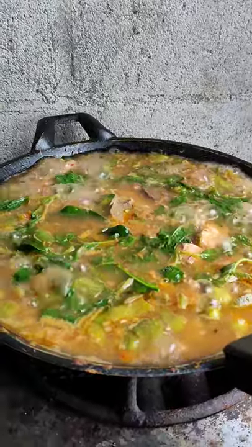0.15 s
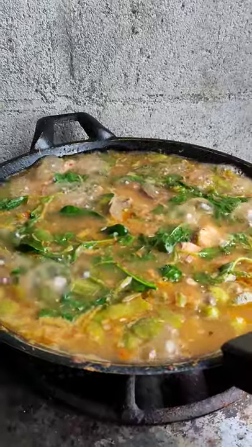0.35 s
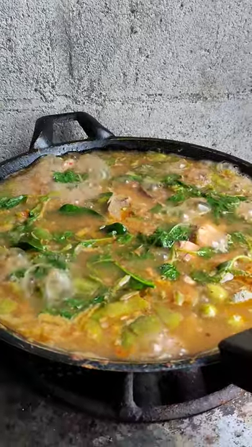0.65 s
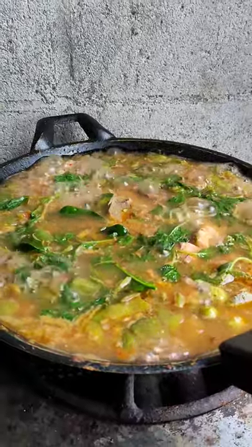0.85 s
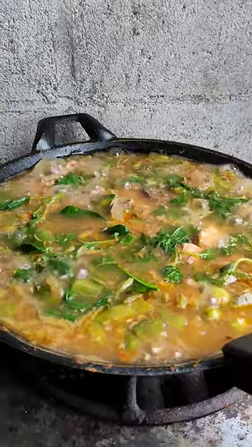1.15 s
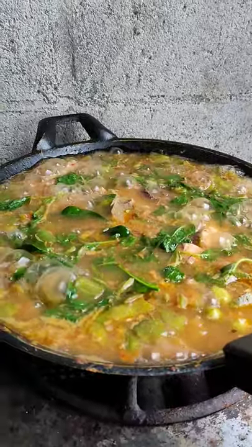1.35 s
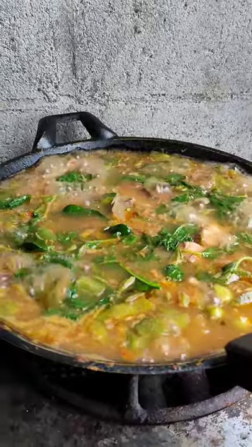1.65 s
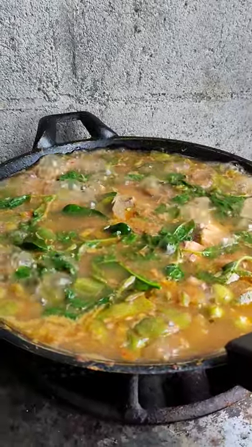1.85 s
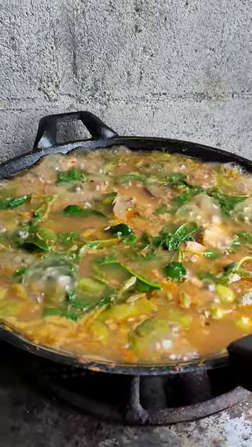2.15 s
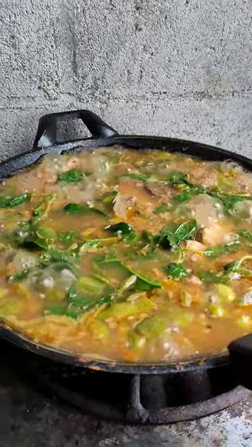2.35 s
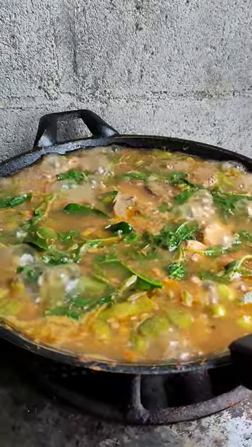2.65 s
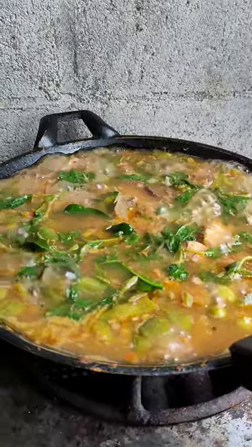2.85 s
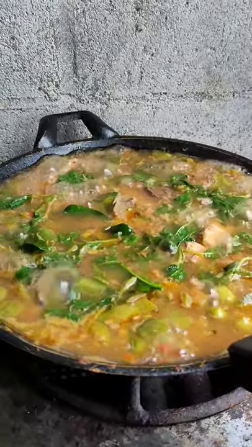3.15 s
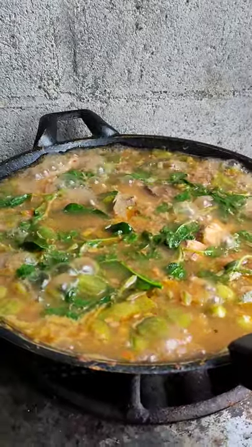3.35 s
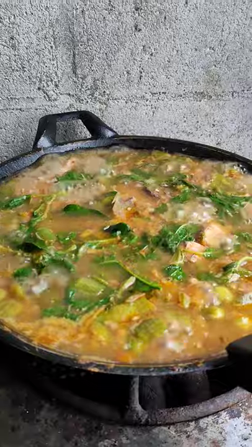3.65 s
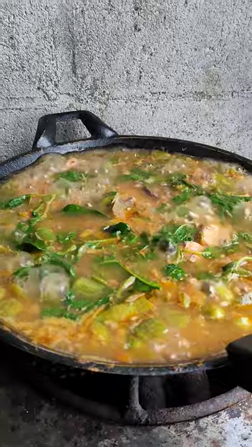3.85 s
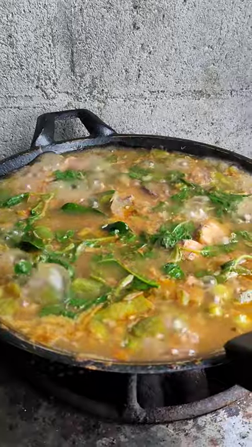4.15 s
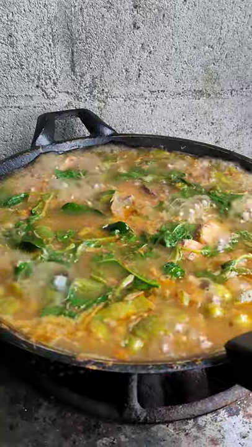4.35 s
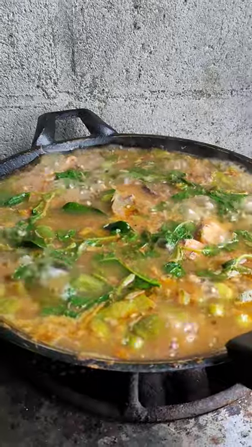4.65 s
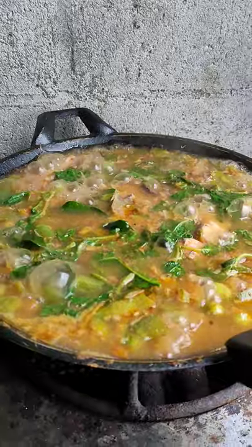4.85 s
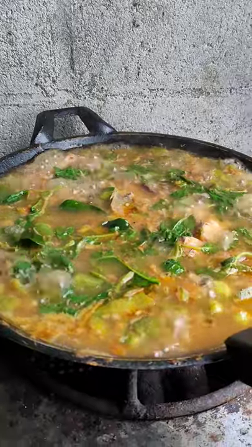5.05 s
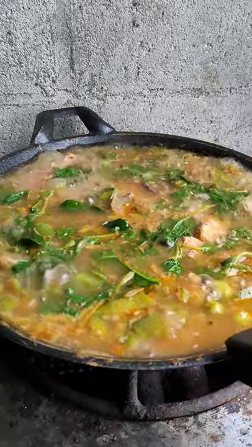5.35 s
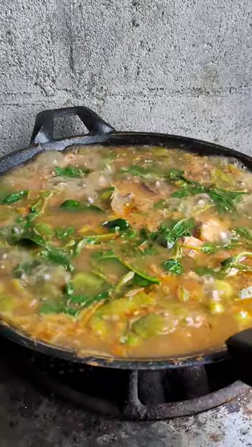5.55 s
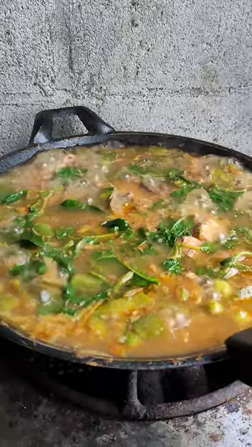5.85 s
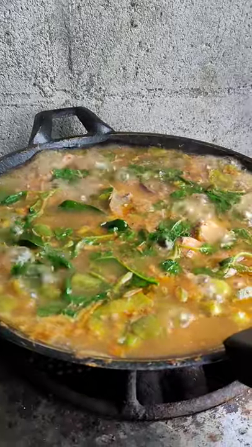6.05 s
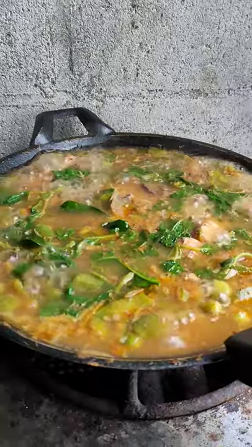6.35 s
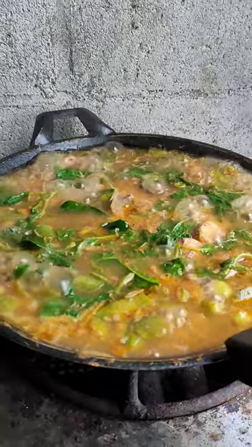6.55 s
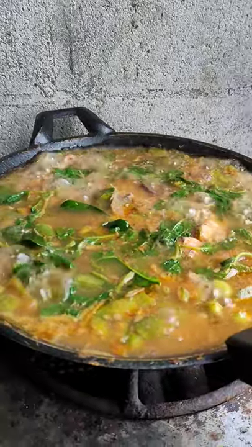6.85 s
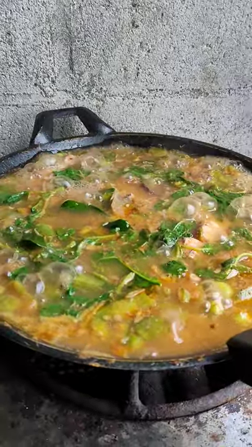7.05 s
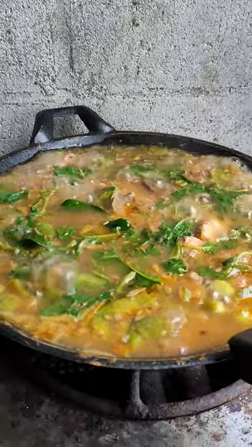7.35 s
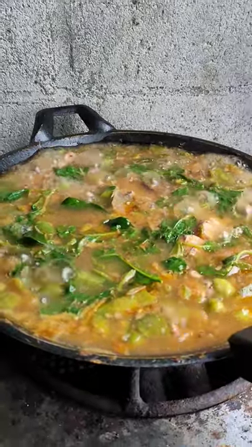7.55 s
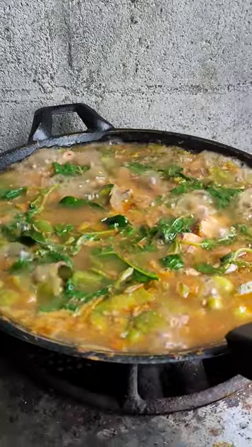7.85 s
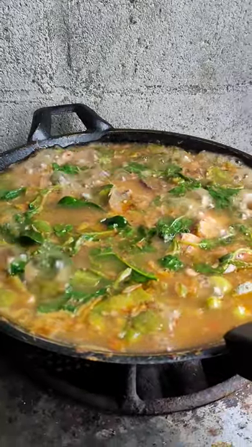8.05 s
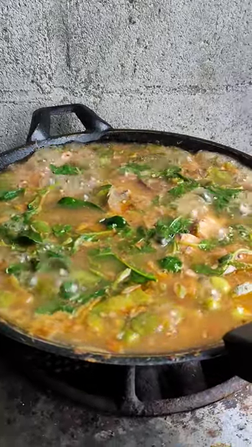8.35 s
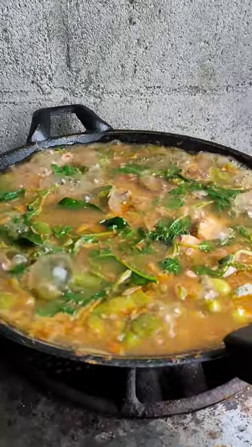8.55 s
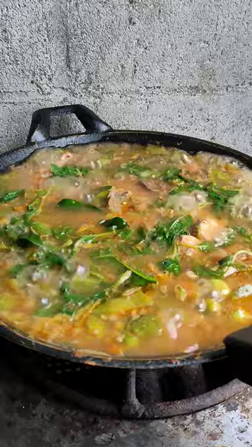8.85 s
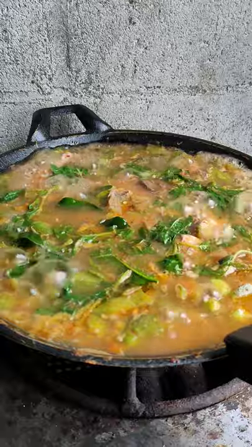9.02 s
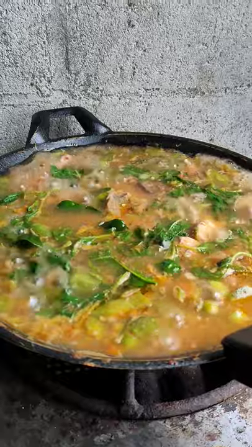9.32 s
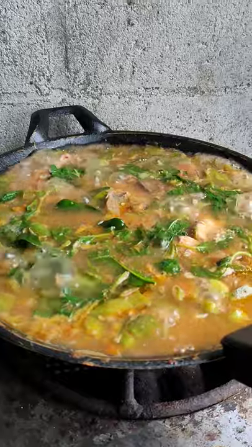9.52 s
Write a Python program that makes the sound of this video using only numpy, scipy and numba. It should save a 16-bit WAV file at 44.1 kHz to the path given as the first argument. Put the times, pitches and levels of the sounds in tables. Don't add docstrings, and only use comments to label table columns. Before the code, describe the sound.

Thick broth boils hard in a cast-iron pan, dense wet bubbling with hollow plops, bright pops and fine spitting over faint burner hiss.

```python
import sys
import numpy as np
from scipy import signal
from scipy.fft import rfft, irfft, next_fast_len
from scipy.io import wavfile
from scipy.ndimage import uniform_filter1d
from numba import njit

SR = 44100
rng = np.random.default_rng(int(sys.argv[2]) if len(sys.argv) > 2 else 0)


def convert_level_to_amplitude(level_db):
    exponent = np.asarray(level_db, float) / 20
    return 10 ** exponent


def store_pcm(level_fs):
    pcm = np.round(np.clip(level_fs, -1, 1) * 32767).astype(np.int16)
    wavfile.write(sys.argv[1], SR, np.atleast_2d(pcm).T)


N = 426888
LEFT_LAG_S = 0.00009
ONSET_SHARE = 0.7


# peak_s, peak_db, pitch_hz, rise_cycles
BURSTS = [(0.2989, -40, 845, 1.1), (0.68, -40, 940, 1.1), (1.8692, -48, 520, 1.2), (2.628, -46, 523, 1.1),
          (2.7333, -42, 740, 0.76), (2.9725, -44.5, 584, 2.8), (3.1524, -46, 940, 3.8),
          (3.3383, -46, 736, 1.5), (3.8721, -40, 930, 1.2), (4.0782, -44, 824, 1.5),
          (4.617, -42, 930, 1.7), (4.9282, -48, 363, 3.5), (5.1376, -38.5, 660, 1.1),
          (5.7271, -42, 835, 0.91), (5.884, -47, 830, 1.1), (6.1515, -47.5, 460, 1.1),
          (6.3465, -48, 820, 2.2), (6.6376, -46.5, 815, 3.6), (7.2186, -41, 930, 0.8),
          (7.4644, -43, 730, 2.4), (7.5372, -40, 930, 0.92), (7.7466, -45, 524, 0.7),
          (7.8791, -40, 940, 1.2), (7.9168, -42, 834, 1.0), (7.9247, -42, 830, 0.89),
          (8.2946, -45, 970, 3.1), (8.7211, -44, 756, 4.1), (8.734, -40, 664, 0.9),
          (8.8224, -39, 845, 1.1), (9.0738, -45, 460, 1.3), (9.0757, -37, 830, 0.74),
          (9.086, -43.0, 830, 0.76), (9.422, -55, 413, 4.6),
          (0.821, -35, 705, 0.62), (0.8322, -36, 730, 0.67), (0.8358, -36, 640, 0.55),
         (1.3063, -39, 550, 0.69), (1.461, -36.5, 600, 0.71), (1.6489, -44.5, 474, 0.96),
         (1.869, -48, 600, 0.55), (3.47, -52, 361, 11.6), (8.62, -55.5, 299.4, 8),
         (3.6434, -39.5, 720, 1.8), (4.0166, -41, 640, 1.8), (4.224, -34, 705, 0.43),
         (4.4293, -43, 646, 1.8), (4.4358, -41, 390, 0.58), (4.6568, -33.5, 600, 0.4),
         (4.8307, -40, 418, 1.1), (4.922, -40, 647, 2.9), (4.9259, -44, 706, 1.9), (5.074, -45, 430, 1.9),
         (5.2152, -32.5, 705, 0.87), (5.5437, -31.5, 584, 0.6), (5.8715, -46, 410, 1.9),
         (6.0347, -48, 654, 2.2), (6.7256, -37, 633, 1.5), (6.7303, -35, 690, 0.84),
         (7.0166, -44, 544, 3.3), (7.3828, -43.5, 506, 1.1), (7.4376, -38, 634, 0.68),
         (7.7185, -27.5, 700, 0.34), (7.7382, -35, 420, 0.42), (8.8953, -42.5, 470, 1.2),
         (9.3162, -45.5, 450, 1.5), (9.429, -46.5, 466, 2.2),
          (0.1393, -38, 1090, 1.0), (0.1444, -39, 870, 1), (0.5433, -37, 785, 0.62),
         (0.5462, -38, 1110, 1.0), (0.687, -33.5, 910, 0.74), (0.693, -41, 1070, 1.7),
         (2.5153, -41, 940, 1.4), (3.0009, -35, 830, 0.56), (3.6487, -35, 1000, 1.5),
         (4.4332, -34, 1160, 1.3), (4.6633, -35, 786, 0.96), (4.93, -39.5, 1190, 2.7),
         (5.069, -39, 860, 1.6), (5.0802, -32.5, 1180, 0.87), (5.221, -35, 1020, 1.2),
         (5.3224, -31.5, 1100, 0.68), (5.863, -30.5, 794, 0.95), (5.872, -33, 960, 1.6),
         (6.0252, -36.5, 1080, 1.2), (6.1916, -35.5, 860, 1.1), (6.358, -42, 970, 1.4),
         (6.763, -39, 1200, 0.96), (7.2247, -36, 1190, 0.98), (7.4512, -31.5, 860, 0.61),
         (7.7343, -39, 920, 2.6), (8.254, -45, 1070, 3.9), (8.633, -33.5, 1070, 0.7),
         (8.7723, -32.5, 850, 0.62), (9.1877, -37, 950, 0.72), (9.3, -34.5, 1110, 0.79),
          (0.8504, -35, 1440, 1.6), (1.2195, -41, 1690, 1.6), (1.2568, -35.5, 1540, 1.2),
         (2.2888, -41, 1700, 0.97), (2.4304, -31, 1670, 0.65), (2.528, -35, 1300, 0.63),
         (2.7457, -34, 1780, 1.5), (2.753, -34, 1310, 0.68), (3.2283, -37, 1560, 0.8),
         (3.338, -35, 1530, 0.97), (3.4685, -34.5, 1440, 0.82), (3.528, -36, 1690, 1.2),
         (3.924, -37, 1720, 2), (4.2807, -40, 1560, 0.87), (5.5886, -35, 1430, 0.73),
         (5.9157, -32, 1610, 0.74), (6.1337, -34, 1560, 0.64), (6.151, -30, 1720, 0.77),
         (6.644, -39, 1330, 1.5), (7.0237, -31, 1300, 0.52), (7.03, -28, 1280, 0.69),
         (7.7373, -33, 1470, 2.1), (8.428, -38.5, 1560, 1.9), (8.8934, -32.5, 1590, 2.3),
         (9.0544, -38, 1640, 1.8), (9.198, -38, 1310, 1.3), (9.6662, -33, 1670, 1.2),
          (0.0881, -32, 1850, 1.5), (0.1485, -34.5, 2020, 1.5), (0.331, -35.5, 1920, 1.5),
        (0.868, -37, 2060, 3.1), (0.862, -43, 1950, 2.2), (1.6276, -38.5, 2030, 2.2),
        (2.014, -37, 1850, 0.97), (2.5436, -29.5, 2090, 1.2), (2.6008, -40, 2150, 2.3),
        (2.829, -32, 1960, 1.4), (2.97, -34, 1850, 0.95), (2.9942, -34, 2050, 0.85),
        (3.151, -34, 2200, 1.3), (3.568, -38, 1900, 0.96), (4.485, -31.5, 1950, 1.2),
        (4.5131, -32.5, 2140, 0.77), (5.0295, -31, 1880, 1), (5.316, -34.5, 2000, 1.3),
        (5.5426, -29, 1850, 0.42), (5.6015, -35, 1850, 1.6), (7.547, -42, 2070, 0.83),
        (7.665, -32, 2000, 1.8), (8.1466, -31.5, 2010, 2.5), (8.1723, -35, 1850, 1),
        (8.307, -40, 2020, 2.3), (8.327, -32.5, 1850, 0.99), (8.6868, -29, 1980, 1),
        (8.732, -32.5, 2080, 0.84), (8.8993, -32.5, 1850, 1.3), (9.1593, -32.5, 1960, 1.2),
        (9.5468, -38, 2100, 5.7),
          (0.026, -37, 2390, 0.91), (0.036, -33, 3560, 0.78), (0.0399, -30.5, 3500, 0.95),
         (0.043, -27, 5950, 0.87), (0.6893, -39, 3230, 1), (1.2466, -43.5, 4370, 1.9),
         (2.943, -34.5, 3760, 2.2), (4.346, -41.5, 5300, 2.5), (4.67, -37, 3020, 1.2),
         (4.917, -40, 2350, 1.7), (5.1373, -37, 5710, 1), (5.2134, -41, 2620, 1.6),
         (5.3448, -37, 3040, 1.3), (5.5422, -31.5, 4000, 1.3), (5.5424, -28.5, 2840, 1.4),
         (4.3455, -47, 3600, 1.3), (4.3435, -38, 2250, 1.6), (5.925, -38, 2660, 1.2),
         (5.9288, -29.5, 2700, 1.1), (6.314, -36.5, 3570, 1.4), (7.033, -38, 2360, 1.8),
         (7.1764, -31.5, 2380, 1.2), (8.1363, -35, 2560, 2.3), (8.1637, -37, 3280, 1.6),
         (8.1385, -52, 620, 0.47), (8.937, -31, 2210, 1.1), (8.953, -33, 2030, 1.1),
         (8.908, -42, 2900, 1.5), (9.2427, -38.5, 2700, 0.93), (9.443, -44, 2580, 2.8),
         (3.129, -38, 3050, 1.6), (6.0008, -44, 2400, 0.7),
          (0.668, -43, 2080, 3), (1.2401, -45, 2290, 3.3), (2.063, -42, 2260, 2.6), (2.5794, -41, 2080, 1.2),
         (2.6255, -38, 1470, 1.2), (2.66, -39, 2080, 1.8), (2.6939, -50, 2290, 2.3),
         (3.1311, -42.0, 1470, 1.2), (3.146, -35, 1850, 1.1), (3.4312, -45, 2070, 2.1),
         (3.5066, -40.5, 2060, 2.1), (3.607, -36.5, 2120, 1.6), (3.62, -42.0, 1850, 2.6),
         (3.6486, -35.5, 1650, 2.8), (3.8123, -40, 2070, 2.7), (3.8275, -41, 2310, 2.8),
         (4.1442, -51, 2080, 2.3), (4.1662, -42, 1850, 1.6), (4.2902, -44, 2080, 1.5),
         (4.532, -49, 2320, 4.6), (4.5404, -58, 2330, 3.7), (4.6703, -37, 1040, 0.98),
         (4.6873, -39, 2080, 1.6), (4.8113, -43.0, 2070, 3.8), (4.9018, -43, 2350, 1.5),
         (5.099, -38, 1480, 2), (5.2132, -37, 2290, 2.2), (5.2467, -43, 2330, 3.3),
         (5.2774, -38, 2100, 1.5), (5.466, -39, 1660, 1.8), (5.518, -42, 1850, 2.5),
         (6.522, -38.5, 1630, 2.9), (6.7716, -38, 1850, 1.6), (7.0406, -45, 2300, 3.4),
         (7.5297, -36, 2040, 1.5), (7.554, -38, 2080, 2.2), (7.6732, -39, 2220, 3.7),
         (7.7454, -42.5, 1310, 2.8), (7.8447, -44, 1850, 1.2), (7.942, -40, 2280, 2.1),
         (8.107, -41, 2330, 2.3), (8.1207, -41, 1650, 1.2), (8.4676, -42, 2040, 3.9),
         (8.749, -39, 1470, 1.2), (8.7904, -38, 1610, 1.8), (8.8675, -45, 1650, 1.8),
         (8.9228, -47, 1650, 2.7), (9.1898, -35, 1310, 1.2),
          (0.414, -47, 3680, 2.5), (0.5628, -45, 3710, 1.8), (0.9599, -44, 5880, 2.5),
        (1.028, -44, 3300, 2.1), (1.5735, -50.0, 4030, 2.9), (2.53, -46, 4160, 2.3),
        (2.8524, -51.5, 4600, 4.1), (3.112, -46, 3900, 2.5), (3.2059, -41, 5880, 0.7),
        (4.6125, -45, 3710, 2.5), (4.6531, -45, 5240, 2.3), (4.781, -52, 5880, 1.7),
        (4.9764, -44, 2940, 1.7), (4.993, -49.0, 3710, 3.1), (5.234, -45, 3710, 2.7),
        (5.3644, -50.0, 3710, 2.5), (5.562, -49.0, 3710, 3.6), (5.9195, -46, 5240, 2.3),
        (6.1685, -50, 3280, 2.6), (6.5236, -43, 3340, 1.4), (6.666, -49, 4160, 2.9),
        (7.063, -52, 4100, 2.9), (7.3628, -41, 3650, 1.3), (8.146, -40, 4160, 1.9), (9.138, -50, 5240, 3),
        (8.601, -45, 3660, 2.3), (8.744, -48.5, 4200, 2.3), (8.749, -48, 3300, 4.1),
        (9.216, -51, 3710, 1.9)]


def large_bubbles():
    return np.array(BURSTS)


def big_pops(bursts):
    peak_s, peak_db, pitch_hz, rise_cycles = bursts.T
    return bubbles(peak_s, peak_db + 1, pitch_hz, rise_cycles, 0 * peak_s, glide=0.021, spread_s=0.00002)


# freq_hz, gain_db
BROTH_COLOUR = [(200, -0.5), (250, -17.5), (310, -1.5), (390, -7), (600, 0.5), (1300, 4), (2100, 8.5),
                (3000, 0), (4400, -5), (4900, -21.5), (6500, -7.5)]


def simmer(boil_db, bursts):
    start_s, pitch_hz, size, length = swarm(count=15000, low_hz=267.4, high_hz=5720)
    cluster_db = boil_db + 1.1 * churn(bursts, after_s=0.0056) + 2.3 * walk(rate_hz=110)
    level_db = cluster_db[(start_s * SR).astype(int)] + 2.07 * size - 6
    rise_cycles = (0.58 + 1.55 * length ** 2) * (pitch_hz / 1000) ** 0.21
    pan_db = 1.1 * rng.standard_normal(len(start_s))
    fizz = bubbles(start_s, level_db, pitch_hz, rise_cycles, pan_db, glide=0.033, spread_s=0.00004)
    return colour(fizz, BROTH_COLOUR, 0.96)


def churn(bursts, after_s):
    kicks = np.zeros(N)
    np.add.at(kicks, (bursts[:, 0] * SR).astype(int), convert_level_to_amplitude(bursts[:, 1] + 55.5))
    return np.tanh(signal.lfilter([1], [1, -np.exp(-1 / (after_s * SR))], kicks))


# time_s, bubbling_db
BOIL = [
    (0.0, -52.5),
    (1.32, -51.5),
    (1.67, -55),
    (2.37, -52.5),
    (2.72, -50),
    (3.1, -52.5),
    (4.93, -50),
    (8.65, -51.5),
    (8.79, -51),
    (9.68, -52),
]


def boil_vigour():
    return np.interp(np.arange(N) / SR, *np.transpose(BOIL))


# centre_s, swell_db, length_s
HEAVES = [(0.034, 10, 0.05), (0.146, 8, 0.027), (0.529, 6, 0.043), (0.861, 7, 0.033), (1.293, 0.5, 0.054),
          (1.468, -0.5, 0.06), (1.848, 4, 0.28), (2.56, 1.5, 0.28), (3.116, 6, 0.24), (3.633, 9.5, 0.11),
          (3.908, 5, 0.033), (4.245, 7.5, 0.066), (4.936, 1.5, 0.055), (5.076, 2.5, 0.074),
          (5.203, 3.5, 0.044), (5.517, 3, 0.14), (5.87, -11, 0.04), (6.016, 5.5, 0.053),
          (6.174, 12.5, 0.046), (6.33, -0.5, 0.081), (6.75, 1, 0.067), (7.038, 8.5, 0.046),
          (7.456, -9, 0.039), (7.735, -9, 0.068), (8.142, 13, 0.049), (8.295, 8, 0.032), (8.9, 1, 0.29),
          (9.058, 3, 0.029), (9.177, 1, 0.035), (9.411, 9, 0.034)]
# centre_s, dip_db
LULLS = [(0.636, -12), (0.907, -6), (1.087, -12), (1.918, -10), (3.034, -4), (3.62, -8.5), (3.707, -8),
         (5.005, -12), (5.169, -8), (5.522, -5), (5.671, -12), (6.115, -9), (6.439, -3), (6.868, -4),
         (7.625, -4), (8.544, -13), (9.003, -9)]


def surface():
    rise_share, fall_share, lull_s = 0.21, 0.43, 0.018
    t = np.arange(0, N / SR + 0.002, 0.001)
    swell_db = np.zeros(len(t))
    for centre_s, heave_db, length_s in HEAVES:
        width_s = length_s * np.where(t < centre_s, rise_share, fall_share)
        swell_db += heave_db * np.exp(-((t - centre_s) / width_s) ** 2)
    for centre_s, dip_db in LULLS:
        swell_db += dip_db * np.exp(-((t - centre_s) / lull_s) ** 2)
    return np.interp(np.arange(N) / SR, t, swell_db)


def bubbles(peak_s, peak_db, pitch_hz, rise_cycles, pan_db, glide, spread_s):
    phase, place = rng.standard_normal((len(peak_s), 2)).T
    lag_s = LEFT_LAG_S + spread_s * place
    rise_s = np.maximum(rise_cycles, 0.2) / pitch_hz
    return np.array([ring(peak_s + side * lag_s, convert_level_to_amplitude(peak_db + side * pan_db), 1.0 * pitch_hz, rise_s,
                          glide, 2 * phase, ONSET_SHARE) for side in (0.5, -0.5)])


@njit
def ring(peak_s, size, hz, rise_s, glide, phase, onset):
    out = np.zeros(N)
    for k in range(len(hz)):
        first = int((peak_s[k] - onset * rise_s[k]) * SR) + 1
        last = min(first + int(6 * rise_s[k] * SR), N)
        for i in range(max(first, 0), last):
            u = (i / SR - peak_s[k]) / rise_s[k] + 1
            turns = hz[k] * rise_s[k] * (u - 1) * (1 + glide * (u - 1) / 2)
            v = u if u > 1 else 1 + (u - 1) / onset
            envelope = (v * np.exp(1 - v)) ** 2
            out[i] += size[k] * envelope * np.cos(2 * np.pi * turns + phase[k])
    return out


def swarm(count, low_hz, high_hz):
    when, pitch, size, length = rng.random((count, 4)).T
    return when * N / SR, low_hz * (high_hz / low_hz) ** pitch, -np.log(size + 0.05), length


# peak_s, peak_db
TICKS = [(0.0433, -36.5), (0.7018, -40), (0.7771, -45), (1.297, -45), (1.728, -42), (2.052, -41.5),
         (2.7503, -54), (2.8439, -46), (3.003, -36.5), (3.8751, -44), (4.1864, -47), (4.239, -47),
         (4.787, -38.5), (4.9666, -42), (5.1337, -39), (5.3043, -44), (5.454, -46), (5.5423, -39),
         (5.8102, -44), (5.948, -45), (6.4283, -38.5), (6.9885, -48), (7.2818, -45), (7.376, -42),
         (7.662, -40), (8.5277, -43), (8.5933, -40), (8.7201, -43), (8.9526, -40), (9.181, -42)]
# peak_s, peak_db
FLECKS = [(0.9577, -52), (2.0166, -54), (2.751, -58), (2.7597, -48.0), (2.851, -49), (2.8576, -51),
          (2.918, -49), (3.2726, -51), (3.7247, -49), (4.3739, -56), (4.6122, -54), (4.712, -51.0),
          (4.991, -49), (5.4646, -47), (5.8014, -58), (5.8125, -52), (5.898, -57), (6.138, -65),
          (4.188, -55), (6.464, -56), (6.942, -53), (8.3542, -58), (8.3841, -61), (8.5288, -55),
          (9.2016, -50)]
# freq_hz, gain_db
HISS_COLOUR = [(300, 11), (2200, 12), (3000, 2.5), (4350, -2), (4900, -4.5), (6200, -7.5), (7300, 2),
               (8100, -2), (9000, -11.5), (13500, -8), (16000, -18)]


def spit(hiss_db):
    fleck_lift_db = 7
    peak_s, peak_db = np.vstack([TICKS, np.array(FLECKS) + [0, fleck_lift_db]]).T
    fray = rng.random((len(peak_s), 5))
    loud = 0
    for k in range(5):
        crack_s = peak_s + 0.0022 * k * fray[:, k]
        pitch_hz = 7000 + 7000 * fray[:, k - 1]
        rise_cycles = 0.5 + 0.79 * fray[:, k - 2]
        loud = loud + bubbles(crack_s, peak_db - 0.5 - 0.16 * k, pitch_hz, rise_cycles, 0 * peak_s,
                              glide=0.0, spread_s=0.00006)
    start_s, pitch_hz, size, length = swarm(count=7000, low_hz=5860, high_hz=15500)
    level_db = (hiss_db + 2.2 * walk(rate_hz=70))[(start_s * SR).astype(int)] + 2.2 * size + 11
    pan_db = 3.6 * rng.standard_normal(len(start_s))
    faint = bubbles(start_s, level_db, pitch_hz, 0.6 + 3.3 * length ** 2, pan_db, glide=0.0, spread_s=0.0001)
    return colour(loud + faint, HISS_COLOUR, 0.78) * convert_level_to_amplitude(3.5)


# peak_s, peak_db, pitch_hz, rise_cycles
SQUEALS = [
    (6.073, -54, 4300, 28),
    (6.084, -56, 3850, 18),
    (1.16, -57, 4950, 14),
    (4.18, -52, 3500, 5),
]


def squeal():
    peak_s, peak_db, pitch_hz, rise_cycles = np.transpose(SQUEALS)
    return bubbles(peak_s, peak_db, pitch_hz, rise_cycles, 0 * peak_s, glide=0.11, spread_s=0.0)


# peak_s, peak_db
LOW_PULSES = [
    (0.083, -75),
    (2.802, -79),
    (2.934, -75),
    (4.649, -73),
    (5.193, -75),
    (5.531, -71),
    (6.299, -83),
    (8.885, -77),
    (9.138, -84),
    (9.654, -67),
]


def low_pulses():
    pitch_hz, rise_cycles, delay_s = 115, 0.34, 0.018
    peak_s, peak_db = np.transpose(LOW_PULSES)
    flat = 0 * peak_s
    return bubbles(peak_s + delay_s, peak_db, pitch_hz + flat, rise_cycles + flat, flat, glide=0.0, spread_s=0.0)


# freq_hz, width_hz, gain_db
PAN_MODES = [
    (312, 29.6, 3),
    (465, 20.6, 4),
    (1850, 330, -22.5),
]


def pan_body(x):
    out = x
    for freq_hz, width_hz, gain_db in PAN_MODES:
        b, a = signal.iirpeak(freq_hz, freq_hz / width_hz, SR)
        out = out + convert_level_to_amplitude(gain_db) * signal.lfilter(b, a, x)
    return out


def burner(hiss_db):
    noise = unit(colour(rng.standard_normal((2, N)), HISS_COLOUR, 1.0))
    follow_db = 0.82 * (hiss_db - hiss_db.mean())
    flutter_db = 0.15 * walk(rate_hz=17) + 1.8 * walk(rate_hz=90)
    return noise * convert_level_to_amplitude(follow_db + flutter_db - 57.5)


def kitchen(x):
    t60_s, tail_db = 0.12, -10
    t = np.arange(SR // 4) / SR
    tail = rng.standard_normal((2, len(t))) * convert_level_to_amplitude(-60 * t / t60_s) * (t > 0.0015)
    tail = signal.sosfilt(signal.butter(2, 700, "high", fs=SR, output="sos"), tail)
    tail = tail / np.sqrt(np.sum(tail ** 2, axis=1)[:, None])
    return x + convert_level_to_amplitude(tail_db) * signal.fftconvolve(x, tail, axes=1)[:, :N]


def unit(x):
    return x / np.sqrt(np.mean(x ** 2))


def colour(x, table, share):
    size = next_fast_len(N)
    table_hz, table_db = np.transpose(table)
    bins_hz = np.maximum(np.fft.rfftfreq(size, 1 / SR), 1)
    gain_db = np.interp(np.log(bins_hz), np.log(table_hz), table_db)
    return irfft(rfft(x, size) * convert_level_to_amplitude(share * gain_db), size)[..., :N]


def walk(rate_hz):
    hold = int(SR / rate_hz)
    steps = np.repeat(rng.standard_normal(N // hold + 1), hold)
    return unit(uniform_filter1d(steps, hold)[:N])


def scene():
    vigour_db = boil_vigour()
    swell_db = surface()
    hiss_db = -70.5 + (vigour_db - vigour_db.mean()) + 0.36 * swell_db
    simmer_db = vigour_db + 2 + 0.63 * swell_db
    bursts = large_bubbles()
    broth = pan_body(simmer(simmer_db, bursts) + big_pops(bursts))
    return kitchen(broth + spit(hiss_db) + squeal()) + burner(hiss_db)


def top_cut(x):
    return signal.sosfilt(signal.butter(12, 15760, fs=SR, output="sos"), x)


# freq_hz, left_minus_right_db
PORTS = [
    (60, -23),
    (110, 42),
    (200, 5.5),
    (380, -3.5),
    (700, 0),
    (1290, 1),
    (2380, 3),
    (4400, 12),
    (8120, -1.5),
    (15000, 16),
]


def record(dry):
    ports = np.array([colour(port, PORTS, share) for port, share in zip(dry, (0.5, -0.5))])
    clear = signal.sosfilt(signal.cheby2(8, 62, 180, "high", fs=SR, output="sos"), ports)
    clear = signal.sosfilt(signal.ellip(8, 0.2, 70, 15700, fs=SR, output="sos"), clear)
    rumble = unit(signal.sosfilt(signal.butter(4, 55, fs=SR, output="sos"), rng.standard_normal(N)))
    return top_cut(clear + convert_level_to_amplitude(-107) * rumble + low_pulses())


dry = scene()
out = record(dry)
store_pcm(out)
```